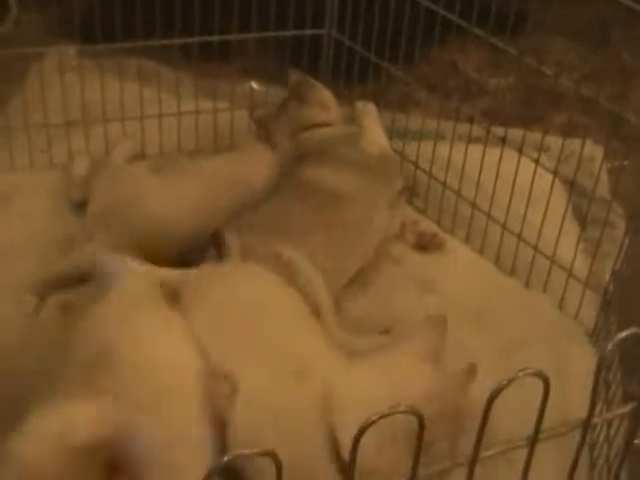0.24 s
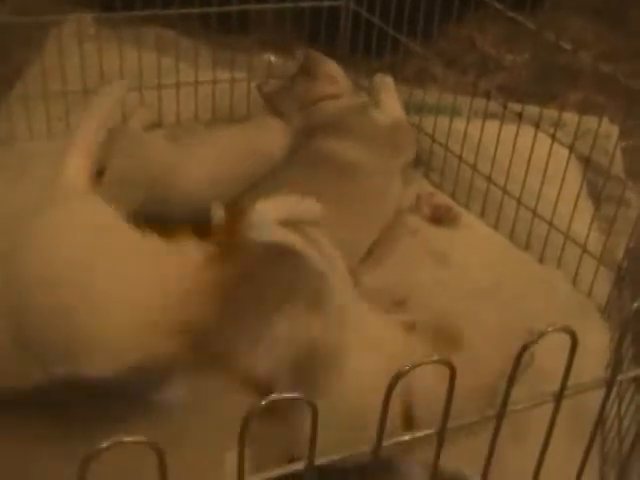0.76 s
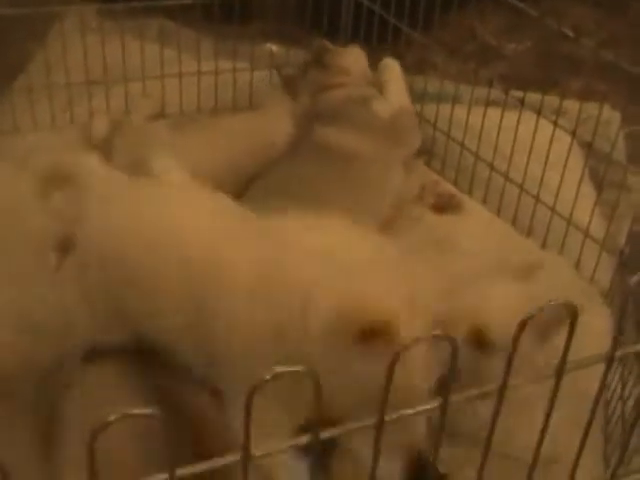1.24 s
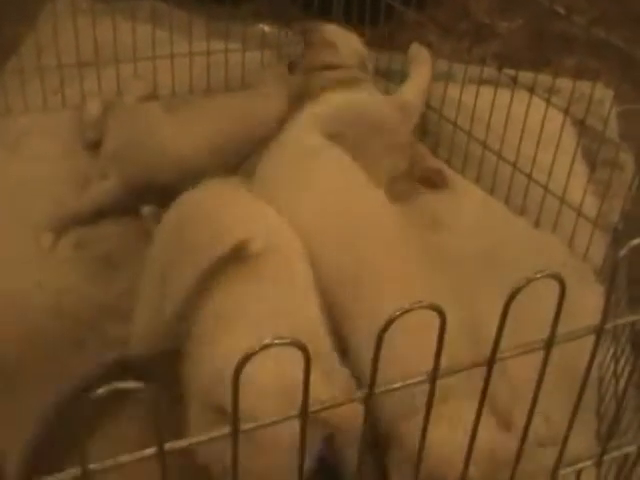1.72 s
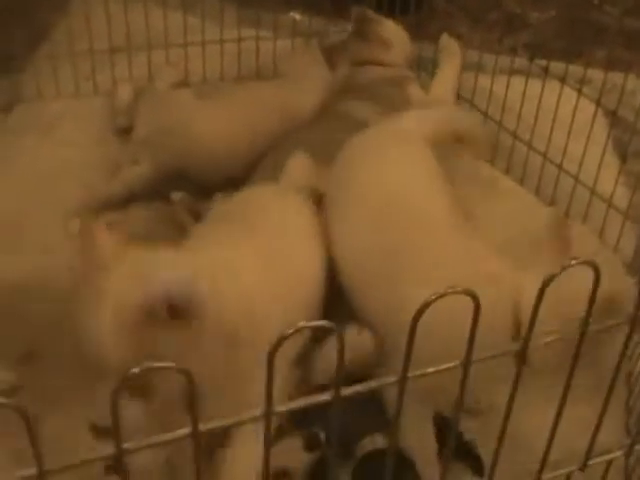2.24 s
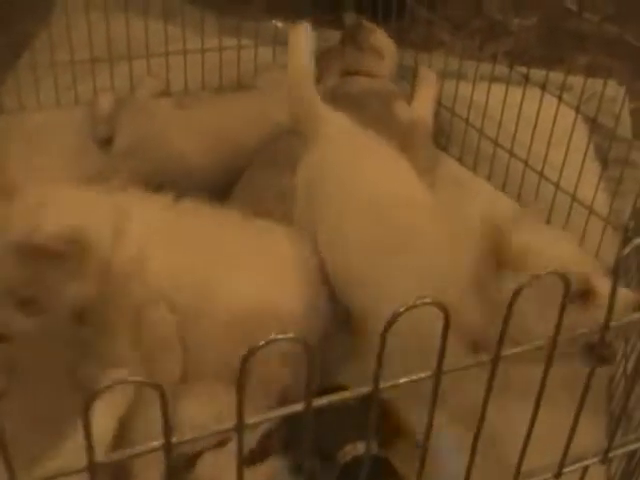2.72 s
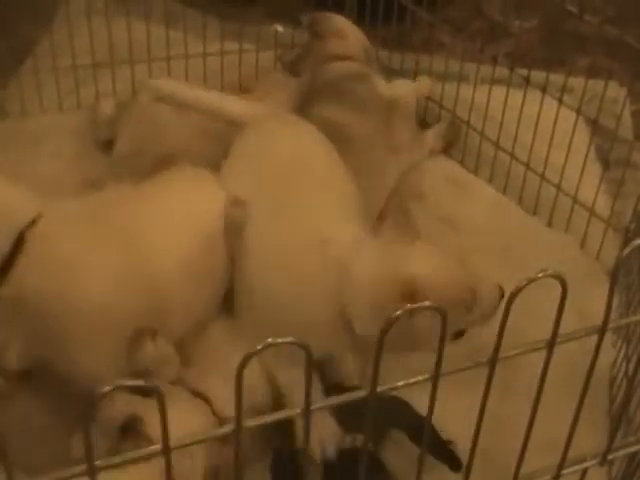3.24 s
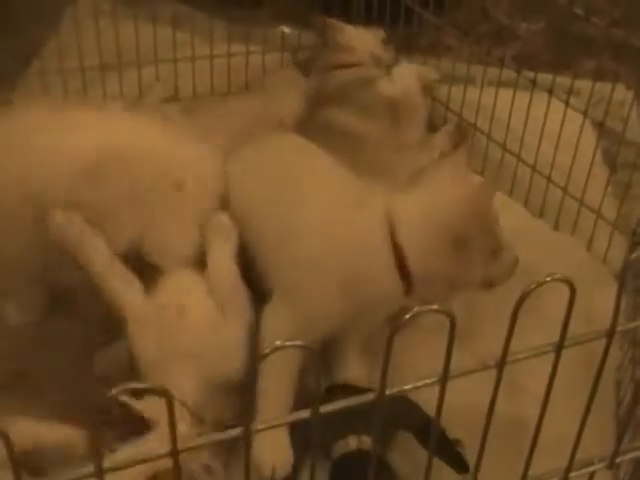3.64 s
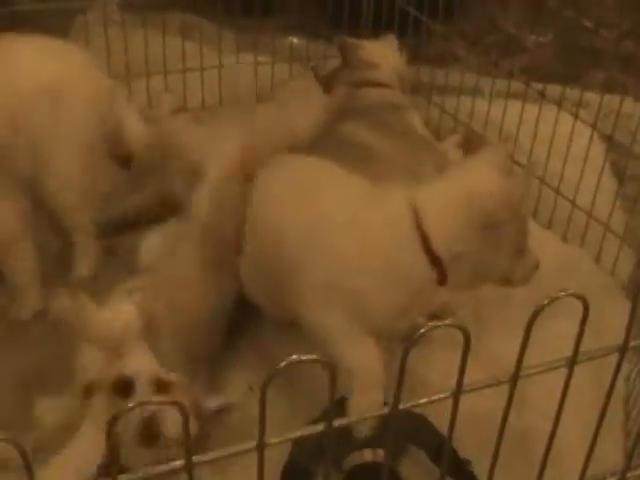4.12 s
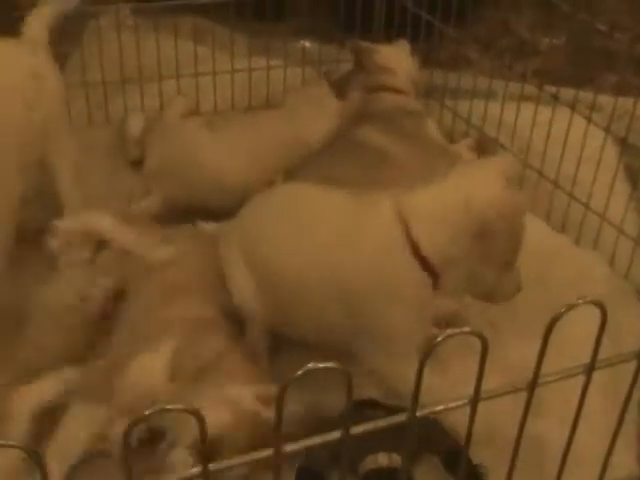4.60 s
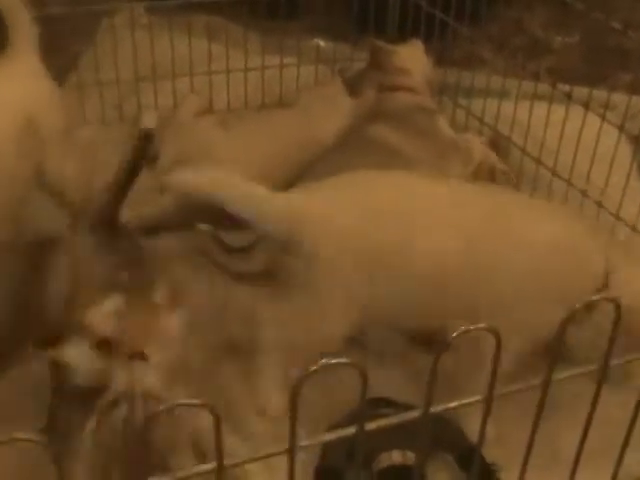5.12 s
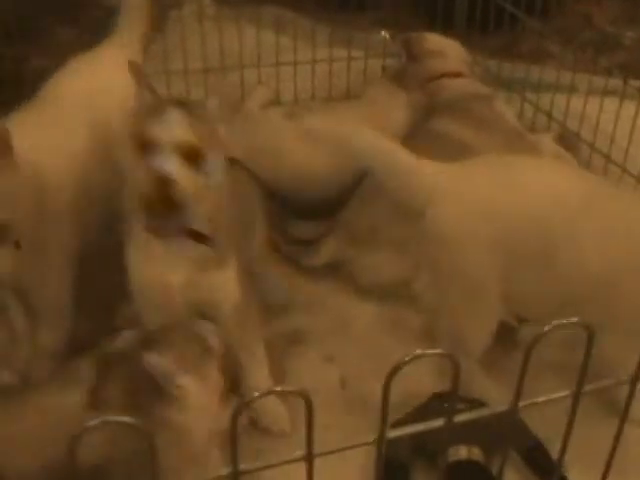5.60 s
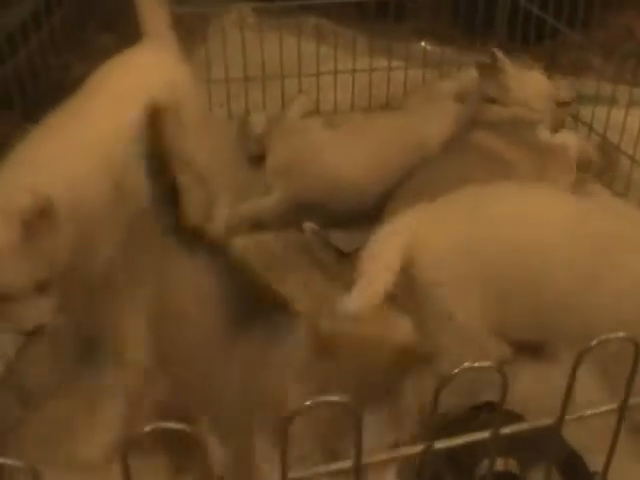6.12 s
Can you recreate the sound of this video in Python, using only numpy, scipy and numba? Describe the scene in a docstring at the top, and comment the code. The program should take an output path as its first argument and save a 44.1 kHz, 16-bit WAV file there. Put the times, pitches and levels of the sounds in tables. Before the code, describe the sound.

A quick burst of puppy growls and rustling fur leads into irregular loud yips, each swelling from a growl and snapping open, many breaking in pitch. Small whimpers and dull body thumps fill the gaps. Later it calms to short growls, clicks of claws, high thin whines, and a breathy rasp. Heard a step away by a handheld camera in a small room with short reflections, slightly dull treble and faint low background noise.

```python
"""Husky puppies wrestle in a wire pen in a small living room, a step away from a hand-held camera.
From the start: a steady hush, noise-made scuffling on bedding, whines (wavering sines) and growls (fold pulses
through resonances). From 0.8 to 3.8 s one yips in arcs that rise out of a growl, many breaking up an octave.
Paws knock from 1.7 s, fur swishes at 4 s, whines return with thin whistles, and one cracks into a rasp near 5.7 s.
The room rings briefly after each call; the camera's limiter holds the loud yips down."""
import sys
import numpy as np
from scipy import signal
from scipy.fft import rfft, irfft, next_fast_len
from scipy.io import wavfile
from scipy.ndimage import uniform_filter1d
from numba import njit

SR = 44100
rng = np.random.default_rng(int(sys.argv[2]) if len(sys.argv) > 2 else 0)


def master_out(mix):
    """Clip the mix to full scale and print it as 16-bit PCM to the path in sys.argv[1]."""
    frames = np.transpose(np.atleast_2d(mix))
    ceiling = np.clip(frames, -1, 1)
    pcm = np.round(ceiling * 32767).astype(np.int16)
    wavfile.write(sys.argv[1], SR, pcm)


N = 280035
TIME = np.arange(N) / SR
CALL_TIME = TIME[:SR // 2]  # the clock of one call

# Steady background spectrum. Each row: frequency in Hz, relative level in dB.
HUSH_SPECTRUM = [(12, -31), (20, 10.5), (69, -2), (241, 1.5), (524, -9), (3230, -14.5), (7610, -23.5),
                 (9950, -23), (11100, -61), (12000, -49), (15600, -93), (22000, -120)]
# Stereo width of diffuse sound. Each row: frequency in Hz, side minus mid in dB.
WIDTH = [(25, 1), (70, -3), (200, -15.5), (500, -12), (1000, -11.5), (2000, -4), (4000, -3), (9000, 3)]
# Bouts of wrestling on bedding. Each row: start in seconds, length in seconds, thumping in dB, rustle in dB.
SCUFFLES = [(0, 0.34, -60, -42), (1.13, 0.42, -41, -58), (1.653, 0.57, -37.5, -58.5),
            (3.965, 0.82, -47, -58.5), (5.278, .55, -61, -54.5), (6.123, 0.34, -35, -61)]
# Bodies and paws on the floor. Each row: frequency in Hz, relative level in dB.
THUD_SPECTRUM = [(40, -7), (80, -6.5), (102, 0), (150, -6), (240, -4), (600, -35), (1500, -87)]
# Fur and cloth. Each row: frequency in Hz, relative level in dB.
RUSTLE_SPECTRUM = [(350, -26), (600, -22), (756, -27), (823, 16), (6930, -18), (11000, 5), (14300, -97),
                   (22000, -120)]
# Whines. Each row: start in seconds, length in seconds, pitch at start, middle and end in Hz, level in dB,
# overtones against fundamental in dB, overtone slope before the throat in dB per octave.
WHINES = [(0, 0.052, 611, 537, 545, -24, 0, 0.5), (0.473, 0.16, 535, 534.7, 572, -30, -13, -1),
          (0.587, 0.1126, 572, 668, 623, -31, -1.5, -1), (1.711, 0.072, 690, 646, 590, -27.5, 1.5, -5),
          (1.936, 0.033, 666, 595, 527, -33.5, -5.5, 1), (2.148, 0.078, 685, 804, 695, -25.5, 4, 5.5),
          (2.246, 0.14, 599.6, 547.5, 541, -31, -7, 0.5), (2.385, 0.045, 552, 532, 524, -29.5, -8.5, -5),
          (5.457, .05, 1267, 1260, 1112, -25, -1.5, 9), (5.518, 0.14, 1064, 838, 784, -36.5, -11, -6),
          (5.651, .195, 811, 863, 886, -31, -6.5, -2), (6.025, 0.13, 875, 800, 786, -39.5, -3, 3)]
# Whining throat. Each row: resonance in Hz, width in Hz, gain in dB.
NARROW_THROAT = [(1490, 1260, 9.5), (2230, 57, 11.5), (3080, 2300, 1), (4500, 420, -15)]
# Growls and huffs. Each row: start in seconds, length in seconds, top pitch in Hz, level in dB,
# mouth against chest in dB, rasp against mouth in dB, tuning of chest and mouth as a factor.
GROWLS = [(0.067, 0.044, 142.7, -15.5, 1, -2, 0.86), (.115, 0.12, 171.5, -17, 0.5, -0.5, 1.01),
          (.245, .1, 163.5, -15.5, 2, -7.5, .9), (0.354, 0.1, 123.8, -21.5, -2.5, -7, 0.92),
          (.47, 0.041, 111, -26.5, 3.5, -8.5, .95), (1.236, .14, 186.1, -32.5, -8.5, -5.5, 1.03),
          (1.5, 0.093, 193, -34, -21.5, 7, 1), (4.049, 0.13, 204.9, -31, -13, -14, 1.037),
          (4.17, .115, 199.9, -31.5, -1, -6.5, 1.083), (4.535, .1, 174.7, -37.5, 1.5, -2, 1),
          (5.047, .08, 201.3, -29, 1.5, 3, 1.056), (5.156, .06, 201, -31.5, 3, 3.5, 1.075),
          (6.137, 0.077, 205.5, -28.5, 0.5, -6, 1.07), (6.216, 0.071, 212.8, -27, 4, -8, 0.99),
          (6.295, 0.055, 192.3, -28, 0.5, -6.5, 0.94)]
# Growl resonances of chest, mouth and muzzle. Each row: centre in Hz, width in Hz, relative gain in dB.
CHEST = [(203, 228, 14.5), (425, 77, 10.5)]
GROWL_MOUTH = [(1393, 295, 32.8), (1759, 310, 31)]
MUZZLE = [(2316, 660, 24), (3770, 290, 20.5), (4560, 6600, -69), (8900, 400, 8.5)]
# A louder growl is more ragged. Each row: level in dB, roughness as a factor.
GROWL_ROUGHNESS = [(-26, 0.713), (-16.5, 1.126)]
# Yips and grunts. Each row: jaw opens in seconds, attack in seconds, stays open in seconds,
# pitch crest after opening in seconds, rise in seconds, fall in seconds, crest in Hz,
# level before slack loss in dB, octave break 0-1, harsh onset 0-1, harshness decay in seconds,
# first mouth resonance in Hz, brightness before losses in dB.
YIPS = [(0.835, 0.006, 0.11, 0.077, 0.08, 0.06, 489.5, 4, 0.9, 0.24, 0.0061, 1587, 5.5),
        (1.062, 0.049, 0.098, 0.054, 0.072, 0.048, 403.4, -4, 0.73, 0, 0.02, 1020, 14.5),
        (1.377, 0.014, 0.091, 0.047, .066, 0.063, 320.4, -13, 0, 0.31, 0.24, 1150, -5),
        (2.462, 0.0059, 0.12, 0.072, 0.082, 0.045, 460, 2, 0.94, 0.08, .01, 1270, 8),
        (2.648, 0.043, 0.11, 0.056, .052, .046, 465.8, 1, 0.42, 0, 0.15, 706, 5.5),
        (2.89, 0.0083, 0.055, .022, 0.032, 0.022, 224.5, -20.5, 0.3, 0.1, .01, 960, -10),
        (2.915, 0.026, 0.11, .036, 0.044, .068, 402.4, 1.5, 0.3, 0.59, 0.0246, 970, -0.5),
        (3.085, 0.0049, 0.075, 0.01, .07, 0.085, 192.2, -23, 0, 0.1, 0.0068, 583, -22),
        (3.381, 0.0085, 0.021, 0.037, .05, 0.043, 261.5, -17.5, 0, 0.12, .01, 1120, -7),
        (3.418, 0.0021, 0.15, 0.089, .102, 0.066, 420.9, 2, 0.58, 0.26, 0.0074, 1070, 5),
        (3.587, 0.0082, 0.072, .04, 0.16, .1, 278, -32, 0, 0.3, 0.0094, 1110, -10),
        (3.682, 0.0075, 0.089, .026, .06, 0.067, 384.1, 0, 0, 0.51, 0.0027, 1040, 2)]
# Yipping throat above the mouth resonance. Each row: centre in Hz, width in Hz, gain before brightness in dB.
THROAT = [(2520, 186, -6), (2968, 99, -8), (3605, 510, -10), (4030, 2800, -19)]
# Voice through a shut mouth. Each row: pitch in Hz, level in dB.
HUM = [(150, -56), (215, -38), (330, -19)]
# Slack folds beat unevenly. Each row: pitch in Hz, roughness 0-1.
ROUGHNESS = [(200, 0.32), (310, 0.36), (390, 0.07)]
# Paws and teeth on floor and pen. Each row: start in seconds, thud in dB before a 13 dB lift,
# click in dB before an 11 dB lift.
KNOCKS = [(1.679, -60, -52), (2.081, -59, -48.5), (4.211, -52, -37.5), (4.731, -41.5, -40.5),
          (4.755, -47, -36), (4.874, -41.5, -61), (4.909, -43, -47.5), (5.284, -38, -52),
          (6.24, -50, -38.5)]
# Knock click spectrum. Each row: frequency in Hz, relative level in dB.
CLICK_SPECTRUM = [(290, -18), (500, -8), (1850, -2.5), (3620, -11), (8600, -18), (11000, -22), (14300, -64),
                  (22000, -120)]
# Fur swishes over cloth. One row: start in seconds, length in seconds, level in dB.
SWISH = (4.025, 0.25, -43)
# Thin whistles through the nose. Each row: start in seconds, length in seconds, pitch in Hz, peak level in dB.
WHISTLES = [(5.355, 0.028, 7060, -38.5), (5.6, 0.016, 6950, -31)]
# A whine cracks into a rasp. One row: start in seconds, hold in seconds, level in dB.
WHINE_RASP = (5.68, 0.004, -24)
# Room decay. Each row: frequency in Hz, time to fall 60 dB in seconds.
ROOM_T60 = [(150, 0.21), (1000, 0.22), (3000, 0.17), (10000, 0.17)]
# Tint of the reflections. Each row: frequency in Hz, relative level in dB.
ROOM_COLOUR = [(250, 4), (400, -6), (650, 8.5), (1200, 4.5), (2100, 3), (4000, 6.5)]


def undb(db):
    """Decibels to gain."""
    return 10 ** (np.asarray(db) / 20)


def unit(x):
    """Scale to rms 1."""
    return x / np.sqrt(np.mean(x ** 2) + 1e-18)


def even(x, size=700):
    """Hold the running rms near 1, so that a curve alone sets the loudness."""
    power = uniform_filter1d(uniform_filter1d(x ** 2, size), size)
    return x / np.sqrt(np.abs(power) + 1e-12)


def add(out, start_s, x):
    """Mix x into out from start_s on."""
    start = max(int(round(start_s * SR)), 0)
    out[start:start + len(x)] += x[:max(N - start, 0)]


def envelope(age, attack_s, length_s, release_s):
    """Straight attack, hold until length_s, exponential release."""
    return np.clip(age / attack_s, 0, 1) * np.exp(-np.maximum(age - length_s, 0) / release_s)


def colour(x, points):
    """Filter by a (Hz, dB) spectrum."""
    hz, db = np.transpose(points)
    size = next_fast_len(len(x))
    log_f = np.log(np.fft.rfftfreq(size, 1 / SR) + 1)
    gain = undb(np.interp(log_f, np.log(hz), db))
    return irfft(rfft(x, size) * gain, size)[:len(x)]


def noise(t):
    """White noise as long as t."""
    return rng.standard_normal(len(t))


def wander(t, rate_hz):
    """Random values, rate_hz a second, joined by straight lines."""
    return np.interp((t - t[0]) * rate_hz, np.arange(len(t)), noise(t))


@njit
def svf(x, hz, width):
    """State-variable band-pass with a moving centre, gain 1 at the centre."""
    y, band, low = np.empty(len(x)), 0., 0.
    for i in range(len(x)):
        g, k = np.tan(np.pi * hz[i] / SR), width / hz[i]
        v = (band + g * (x[i] - low)) / (1 + g * (g + k))
        band, low, y[i] = 2 * v - band, low + 2 * g * v, k * v
    return y


@njit
def follow(x, attack, release):
    """Envelope that rises fast and sinks slowly."""
    y, level = np.empty(len(x)), 0.
    for i in range(len(x)):
        level += (x[i] - level) * (attack if x[i] > level else release)
        y[i] = level
    return y


def ring(x, modes):
    """Parallel resonances (Hz, width Hz, dB) of alternating sign."""
    out = np.zeros(len(x))
    for k, (hz, width_hz, db) in enumerate(modes):
        out += (-1) ** k * undb(db) * svf(x, hz + np.zeros(len(x)), float(width_hz))
    return out


def steep(x, modes):
    """Each resonance applied twice, which keeps the valleys dark."""
    out = np.zeros(len(x))
    for hz, width_hz, db in modes:
        mode = [(hz, width_hz, 0)]
        out += undb(db) * ring(ring(x, mode), mode)
    return out


def cut(x, hz, kind, order):
    """Butterworth low-pass or high-pass."""
    return signal.sosfilt(signal.butter(order, min(hz, .45 * SR), kind, fs=SR, output="sos"), x)


def folds(t, hz, rough, flip, jitter, shimmer_db, air, choke=0):
    """Vocal fold pulses with puffs of air; flip grows a second closure between them, choke spares every third."""
    phase = 2 * np.cumsum(hz * (1 + jitter * rough * wander(t, 400))) / SR  # two closures a cycle
    closure = np.round(phase).astype(int)
    size = undb(shimmer_db * rough * noise(t)[closure])
    size = size * np.where(closure % 2, flip, 1)
    size = size * np.where(closure % 6, 1 - choke, 1)
    samples_off = (phase - closure) * SR / (2 * hz)
    pulses = size * np.sinc(samples_off / 2) * np.exp(-(samples_off / 8) ** 2)
    puffs = size * np.cos(np.pi * (phase - closure)) ** 2 * noise(t)
    return unit(pulses) + air * rough * unit(puffs)


def diffuse(mid, side):
    """Sound from all around on two close capsules: alike in the bass, unrelated in the treble."""
    side = colour(side, WIDTH)
    return np.array([mid + side, mid - side])


def hush(level_db=-41):
    """Steady, diffuse coloured noise."""
    mid, side = colour(noise(TIME), HUSH_SPECTRUM), colour(noise(TIME), HUSH_SPECTRUM)
    return unit(diffuse(mid, side)) * undb(level_db)


def fur_grains(spread_db=3, grain_db=4):
    """Rubbing fur and cloth: noise in small grains of uneven level."""
    return noise(TIME) * undb(grain_db * wander(TIME, 1100) + spread_db * wander(TIME, 8.8))


def scuffle(attack_s=0.031, release_s=0.11, thump_spread_db=3, stir_thump_db=-51, stir_rustle_db=-66.5):
    """Bodies bump the floor and fur rubs cloth, in bouts over a constant stir: the puppies never lie quite still."""
    thump, rustle = undb(stir_thump_db), undb(stir_rustle_db)
    for start_s, length_s, thump_db, rustle_db in SCUFFLES:
        bout = envelope(TIME - start_s, attack_s, length_s, release_s)
        thump = np.hypot(thump, bout * undb(thump_db))
        rustle = np.hypot(rustle, bout * undb(rustle_db))
    thumps = unit(colour(noise(TIME), THUD_SPECTRUM) * undb(thump_spread_db * wander(TIME, 25)))
    return thumps * thump + unit(colour(fur_grains(), RUSTLE_SPECTRUM)) * rustle


def whines(waver=.012, air=.5, flicker_db=4, edge_hz=3670, attack_s=0.0047, release_s=0.0085):
    """A nearly pure fundamental quavers along one smooth bend, with breathy, flickering overtones."""
    out, t = np.zeros(N), CALL_TIME
    for start_s, length_s, start_hz, middle_hz, end_hz, level_db, overtone_db, slope_db in WHINES:
        bend = np.polyfit([0, .5, 1], [start_hz, middle_hz, end_hz], 2)
        hz = np.polyval(bend, np.minimum(t / length_s, 1))
        phase = 2 * np.pi * np.cumsum(hz * (1 + waver * wander(t, 197.6))) / SR
        harmonics = np.zeros(len(t))
        for k in range(2, 10):
            harmonics += np.sin(k * phase) * undb(slope_db * np.log2(k) + flicker_db * wander(t, 40))
        throat = steep(harmonics + air * noise(t), NARROW_THROAT)
        overtones = even(cut(throat, edge_hz, "low", order=4))
        voice = even(np.sqrt(2) * np.sin(phase) + overtones * undb(overtone_db))
        add(out, start_s, voice * undb(level_db) * envelope(t, attack_s, length_s, release_s))
    return out


def growls(flutter_db=2, hiss_db=-14, droop=.1, attack_s=0.015, release_s=0.0088):
    """Slow, ragged closures on an arch of pitch excite chest, mouth and muzzle; higher huffs are breathier."""
    out, t = np.zeros(N), CALL_TIME
    for start_s, length_s, top_hz, level_db, mouth_db, rasp_db, tuning in GROWLS:
        # droop: share by which the pitch is lower at both ends
        hz = top_hz * (1 - droop * (2 * np.minimum(t / length_s, 1) - 1) ** 2)
        air = np.interp(hz, [175, 235], [.5, .7])
        rough = np.interp(level_db, *np.transpose(GROWL_ROUGHNESS))
        source = folds(t, hz, rough, 0, jitter=.08, shimmer_db=3.5, air=air)
        jaw = 1 + .07 * wander(t, 35)  # shifts all resonances
        muzzle_db = mouth_db + rasp_db
        voice = unit(steep(noise(t), [(4360, 3600, 0)])) * undb(muzzle_db + hiss_db)  # hiss past the teeth
        parts = [(CHEST, jaw * tuning, 0), (GROWL_MOUTH, jaw * tuning, mouth_db), (MUZZLE, jaw, muzzle_db)]
        for modes, shift, part_db in parts:
            moving = [(centre_hz * shift, width_hz, gain_db) for centre_hz, width_hz, gain_db in modes]
            voice = voice + even(steep(source, moving)) * undb(part_db + flutter_db * wander(t, 66.0))
        add(out, start_s, even(voice) * undb(level_db) * envelope(t, attack_s, length_s, release_s))
    return out


def yips(chest_hz=215, chest_db=8, mouth_width_hz=230, edge_hz=4900, highpass_hz=600, leak_db=-40, spit_db=-25):
    """One swell of effort lifts pitch, level and brightness; the jaw snaps open on it, a chesty hum around it."""
    lead_s, release_s = .1, 0.013  # the call's clock starts lead_s before the jaw opens
    rest_hz, closing_mouth_hz = 152.85, 1328  # slack pitch; mouth resonance as the jaw shuts
    fall_shape = 3.2  # the pitch lingers on its crest, then collapses
    waver, throat_drift = .01, .03  # shares of pitch (off the crest) and of throat resonances
    slack_db, slack_dull_db = -4, -11.5  # level and brightness change from full effort to none
    closing_dull_db, shut_dull_db, harsh_bright_db = -6.5, -11.5, 4  # further brightness changes
    out, age = np.zeros(N), CALL_TIME - lead_s
    for (start_s, attack_s, open_s, crest_s, rise_s, fall_s, crest_hz, level_db,
         octave, harsh, harsh_s, first_mouth_hz, bright_db) in YIPS:
        rising = ((crest_s - age) / rise_s) ** 2
        falling = np.abs((age - crest_s) / fall_s) ** fall_shape
        effort = np.exp(-np.where(age < crest_s, rising, falling))
        hz = rest_hz + (crest_hz - rest_hz) * effort
        hz = hz * (1 + waver * (1 - effort ** 4) * wander(age, 92.9))
        jaw = envelope(age, attack_s, open_s, release_s)
        closing = np.clip(age / open_s, 0, 1)
        onset = harsh * np.exp(-(age / harsh_s) ** 2 / 2) * (age > 0)

        hum = undb(np.interp(hz, *np.transpose(HUM))) * np.minimum(10 * effort, 1)
        gain = hum + jaw * undb(level_db + slack_db * (1.5 - effort))  # half of slack_db even at full effort
        rough = np.clip(np.interp(hz, *np.transpose(ROUGHNESS)) + onset, 0, 1)
        choke = np.interp(rough, [.45, .75], [0, .8])
        flip = np.clip(octave * np.sqrt(effort), 0, 1)
        source = folds(age, hz, rough, flip, jitter=.05, shimmer_db=6, air=.7, choke=choke)

        mouth_hz = first_mouth_hz + (closing_mouth_hz - first_mouth_hz) * closing
        dull_db = slack_dull_db * (1 - effort) + closing_dull_db * closing ** 2 + shut_dull_db * (1 - jaw)
        bright = undb(bright_db + dull_db + harsh_bright_db * onset)
        drift = 1 + throat_drift * wander(age, 31.8)
        upper = ring(source, [(centre_hz * drift, width_hz, db) for centre_hz, width_hz, db in THROAT])
        throat = ring(source, [(mouth_hz, mouth_width_hz, 0)]) - bright * upper
        throat = cut(cut(throat, edge_hz, "low", order=14), highpass_hz, "high", order=2)
        pressed = np.maximum(gain / undb(-25.5), 1) ** -.7  # the harder the voice is pressed, the less chest
        chest = steep(source, [(chest_hz, 125, chest_db), (610, 170, 0)]) * pressed
        leak = steep(source, [(10160, 2600, leak_db)])
        spit = onset * steep(source, [(8480, 4100, spit_db)])
        add(out, start_s - lead_s, even(throat + chest + leak + spit) * gain)
    return out


def knocks(thud_s=0.0043, click_s=.007):
    """A paw lands with a dull thud and the click of claws: two decaying noise bursts."""
    out, t = np.zeros(N), TIME[:SR // 8]
    for start_s, thud_db, click_db in KNOCKS:
        thud = unit(colour(noise(t), THUD_SPECTRUM)) * np.exp(-t / thud_s) * undb(thud_db + 13)
        click = unit(colour(noise(t), CLICK_SPECTRUM)) * np.exp(-t / click_s) * undb(click_db + 11)
        add(out, start_s, thud + click)
    return out


def swish(attack_s=0.013, release_s=0.004):
    """Fur swishes over cloth: grains through one broad resonance."""
    start_s, length_s, level_db = SWISH
    rub = unit(ring(fur_grains(), [(7400, 4900, 0)]))
    return rub * undb(level_db) * envelope(TIME - start_s, attack_s, length_s, release_s)


def whistles(attack_s=0.011, release_s=0.0078, waver=0.0024):
    """Air squeezed through a nose gives a short, thin tone."""
    out, t = np.zeros(N), CALL_TIME
    for start_s, length_s, hz, level_db in WHISTLES:
        tone = np.sin(2 * np.pi * np.cumsum(hz * (1 + waver * wander(t, 220))) / SR)
        add(out, start_s, tone * undb(level_db) * envelope(t, attack_s, length_s, release_s))
    return out


def rasp(attack_s=0.035, release_s=.035):
    """A whine cracks into a breathy rasp: noise through throat resonances."""
    start_s, hold_s, level_db = WHINE_RASP
    air = unit(steep(noise(TIME), [(2150, 960, 12.0), (3140, 780, 5), (4100, 900, -2)]))
    return air * undb(level_db) * envelope(TIME - start_s, attack_s, attack_s + hold_s, release_s)


def room(x, wet_db=-3, first_wall_s=0.004):
    """Dense reflections off floor and walls, dying sooner in the treble."""
    t = TIME[:SR * 3 // 5]
    hz, t60_s = np.transpose(ROOM_T60)
    log_f = np.log(np.fft.rfftfreq(len(t), 1 / SR) + 1)
    shares = [np.interp(log_f, np.log(hz), row) for row in np.eye(len(hz))]  # overlapping bands
    tails = []
    for white in (rfft(noise(t)), rfft(noise(t))):
        tail = np.zeros(len(t))
        for share, decay_s in zip(shares, t60_s):
            tail += irfft(white * share, len(t)) * np.exp(-np.log(1000) * t / decay_s)
        tails.append(unit(colour(tail * (t > first_wall_s), ROOM_COLOUR)) / np.sqrt(len(t)))
    return undb(wet_db) * signal.fftconvolve(x[None], diffuse(*tails), axes=1)[:, :N]


def scene():
    """All the puppies in the middle, the room around them, over a quiet hush."""
    pen = scuffle() + whines() + growls() + yips() + knocks() + swish() + whistles() + rasp()
    return pen + room(pen) + hush()


def record(dry, ceiling_db=-5, attack_s=0.00035, release_s=0.035, top_hz=11300):
    """A fast limiter ducks loud peaks, what still exceeds full scale clips, and a steep low-pass ends the band."""
    attack, release = 1 - np.exp(-1 / (attack_s * SR)), 1 - np.exp(-1 / (release_s * SR))
    peaks = follow(np.abs(dry).max(axis=0), attack, release)
    held = np.clip(dry / np.maximum(peaks / undb(ceiling_db), 1), -1, 1)
    return signal.sosfilt(signal.ellip(8, .2, 70, top_hz, fs=SR, output="sos"), held)


dry = scene()
out = record(dry)
master_out(out)
```